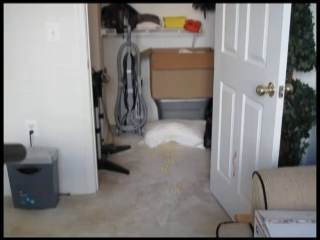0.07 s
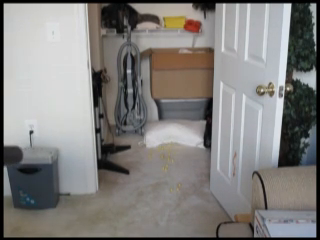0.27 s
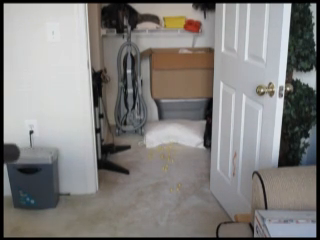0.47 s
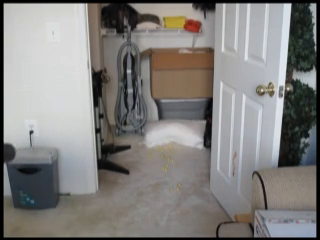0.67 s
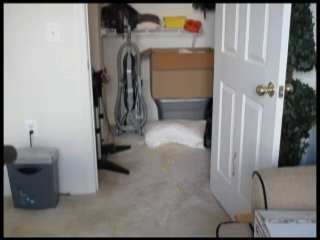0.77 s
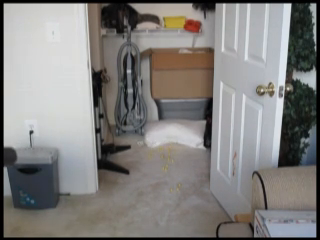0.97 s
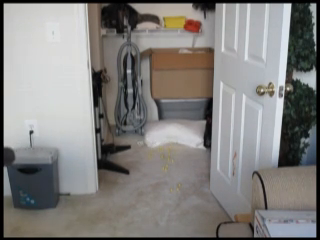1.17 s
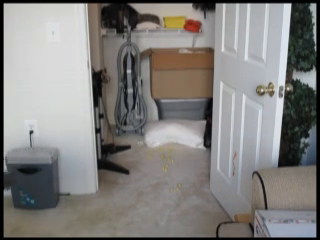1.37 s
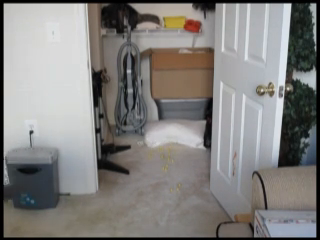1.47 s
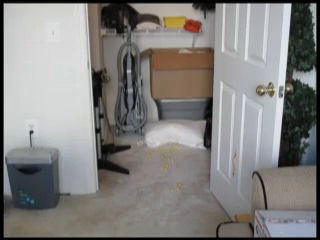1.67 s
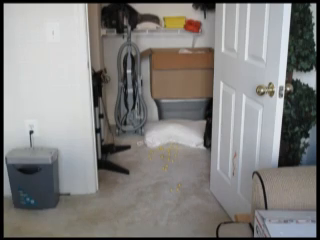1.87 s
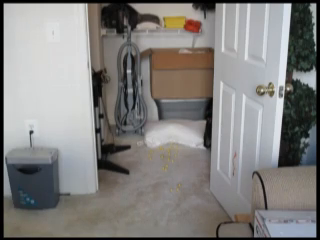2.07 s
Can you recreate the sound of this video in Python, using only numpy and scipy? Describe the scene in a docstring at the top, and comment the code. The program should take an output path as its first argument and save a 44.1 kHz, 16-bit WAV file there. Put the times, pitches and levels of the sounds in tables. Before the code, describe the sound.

A paintball marker fires about eight rapid cycles from 0 to 0.67 s, sharp cracks with gas pops, hammer rasp and bright, half-second room ring. Balls thud dully into a closet pillow, the last at 0.72. A rumbling hiss swells around 0.8-0.9. Hard hollow balls click from 0.85 to 1.2. Faint rustle follows; hand knocks and rubbing on the camera run from 1.68, strongest near 1.92, over quiet hum and thin whine.

```python
"""A quick string of sharp shots from a paintball marker rings in a small, bright room, close to one microphone.
Each cycle sums a noise rasp (hammer), bell pulses (gas), damped sines (crack, ping, ticks) and a diffuse tail.
The balls thud into a pillow in a closet as noise bursts; a rumbling hiss swells after the last cycle.
Hard balls click as noise snaps and damped modes, and a hand knocks and rubs on the camera body.
Steady noise, a faint rustle and two sines, a hum and a whine, lie underneath."""
import sys
import numpy as np
from scipy import signal
from scipy.fft import rfft, irfft, next_fast_len
from scipy.io import wavfile
from scipy.ndimage import map_coordinates

SR = 44100
rng = np.random.default_rng(int(sys.argv[2]) if len(sys.argv) > 2 else 0)


def unload_audio(sound):
    """Save the sound as a 16-bit wav file, at the path given as the first command line argument."""
    columns = np.transpose(np.atleast_2d(sound))
    # keep every value between -1 and 1, then stretch to whole-number steps
    steps = np.round(np.clip(columns, -1, 1) * 32767)
    wavfile.write(sys.argv[1], SR, steps.astype(np.int16))


N = 93888
LEAD = SR // 10  # samples kept ahead of time zero, for sounds that precede their event
T = np.arange(-LEAD, N) / SR  # time since an event [s]

# colour of the hammer's rasp and of the crack's spitting noise: (frequency [Hz], level [dB])
RASP_COLOUR = [(60, -38), (150, -1), (350, 6), (800, 2.5), (1400, -1), (2900, -1.5), (5000, -2), (7500, -3),
               (9800, 3), (11500, -9.5)]
# vibration modes of the hollow camera body: (frequency [Hz], level [dB], t60 [s])
BODY_MODES = [(442, -17.5, 0.13), (531, -10, 0.026), (597, -9.5, 0.071), (668, 4, 0.011),
              (1005, -19, 0.087), (1206, -13, 0.01), (2060, -31, 0.03)]
# colour of fingertip contact: (frequency [Hz], level [dB])
FINGERTIP_COLOUR = [(300, -10.5), (1100, 6), (2500, -9.5), (5000, -16), (11000, -24)]
# colour of the room's diffuse answer to a shot: (frequency [Hz], level [dB])
ROOM_COLOUR = [(40, -35), (100, -19), (200, -6), (320, -5), (580, -1), (720, -11.5), (900, -2), (1400, -4),
               (1800, -2.5), (2600, -1), (3800, -5), (6500, -5.5), (8500, -1.5), (9700, -1.5),
               (10700, -3.5), (11500, -14)]
KNOCK_RISE_S = 0.0015


def amp(db):
    """A level in decibels is 20 times the log of the amplitude ratio."""
    return 10 ** (np.asarray(db) / 20)


def unit(x):
    """Normalisation: equal mean power, rms 1."""
    return x / np.sqrt(np.mean(x ** 2) + 1e-20)


def along(points, hz):
    """Interpolation of (frequency [Hz], value) points on a logarithmic frequency axis."""
    f, v = np.transpose(points)
    return np.interp(np.log(hz + 1), np.log(f + 1), v)


def filtered(x, response):
    """Linear filtering: the spectrum of x is multiplied by a response of frequency."""
    m = next_fast_len(len(x) + 8192, True)  # padding keeps the filter's tail from wrapping round
    hz = np.fft.rfftfreq(m, 1 / SR)
    return irfft(rfft(x, m) * response(hz), m)[:len(x)]


def thin(x, cut_hz):
    """Weak bass radiation: a causal second-order high-pass."""
    def response(hz):
        return (1j * hz) ** 2 / (cut_hz ** 2 - hz ** 2 + np.sqrt(2) * 1j * hz * cut_hz)
    return filtered(x, response)


def noise(spectrum):
    """Spectral shaping: white noise coloured by a spectrum, rms 1."""
    white = rng.standard_normal(len(T))
    return unit(filtered(white, lambda hz: amp(along(spectrum, hz))))


def fade(t60, rise=1e-4, delay=0):
    """Exponential decay, 60 dB in t60 seconds, after a quick attack."""
    t = np.maximum(T - delay, 0)
    return amp(-60 * t / t60) * (1 - np.exp(-t / rise))


def bump(delay, width):
    """Gaussian pulse: a bell-shaped swell."""
    return np.exp(-.5 * ((T - delay) / width) ** 2)


def level(s, db):
    """Slow gain interpolated in decibels, down at -120 dB before its first point."""
    return amp(np.interp(T, s, db, left=-120))


def ring(modes, rise, detune, spread_db):
    """Modal synthesis: a sum of damped sines, a little different at every blow."""
    total = 0
    for hz, db, t60 in modes:
        gain = amp(db + spread_db * rng.normal())
        mode_hz = hz * (1 + detune * rng.normal())
        total = total + gain * fade(t60, rise) * np.sin(2 * np.pi * mode_hz * T)
    return total


def at(s, x):
    """Time shift: x delayed by s seconds, or advanced if s is negative."""
    if s < 0:
        return np.interp(T - s, T, x, left=0, right=0)
    return np.pad(x, (round(s * SR), 0))[:len(x)]


def room_tail(spectrum):
    """Diffuse reverberation: coloured noise in which each frequency decays at its own rate."""
    # reverberation time: (frequency [Hz], t60 [s])
    decay_times = [(150, 0.48), (500, 0.59), (2500, 0.56), (6000, 0.58), (10000, 0.67)]
    rise_s = 0.0013
    hz, t, z = signal.stft(noise(spectrum), SR, nperseg=256)
    since = np.maximum(t + T[0], 0)
    z = z * amp(-60 * since / along(decay_times, hz)[:, None])
    tail = signal.istft(z, SR, nperseg=256)[1][:len(T)]
    return tail * (1 - np.exp(-np.maximum(T, 0) / rise_s))


def marker():
    """Superposition: every cycle is a direct sound, its wall echoes and its reverberation."""
    # firing cycles: (time [s], crack [dB], gas push [dB], hammer rasp [dB], room [dB])
    cycles = [(-.009, 0.5, 10.5, -10, -1.5), (0.0567, -4.5, -11.5, -6, -2), (0.1561, 0.5, 1.5, 8, -0.5),
              (.2752, -0.5, 5.5, 6, 1), (.39, 1.5, 6.5, 8, 0), (0.508, 2, 5, 9, -1),
              (.6101, 2.5, 4, 5.5, -3), (0.6675, -2.5, -8, 2, -1.5)]
    usual_tail = room_tail(ROOM_COLOUR)
    out = 0
    for s, crack_db, push_db, rasp_db, room_db in cycles:
        push = gas_push(push_db)
        burst = crack()
        sharp = burst + metal_ping() + bolt_ticks() + wall_echoes(burst + push)
        answer = diffuse_room(usual_tail) + lingering_modes()
        out = out + at(s, push + amp(crack_db) * sharp + hammer_rasp(rasp_db) + amp(room_db) * answer)
    return out


def hammer_rasp(rasp_db):
    """Sliding friction: noise that starts ahead of the crack and dies quickly after it."""
    lead_s, rise_s, t60_s, stop_t60_s = 0.0189, 0.0019, 0.11, 0.029
    slide = fade(t60_s, rise=rise_s, delay=-lead_s)
    stop = amp(-60 * np.maximum(T, 0) / stop_t60_s)
    return amp(-25.5 + rasp_db) * slide * stop * noise(RASP_COLOUR)


def gas_push(push_db):
    """Expanding gas: bell-shaped pressure pulses through a first-order high-pass."""
    # pressure pulses: (delay after the crack [s], width [s], level [dB])
    pulses = [(-.00077, 0.00014, -11), (.0014, 0.00024, -13)]
    cut_hz = 380
    pressure = sum(amp(db) * bump(delay, width) for delay, width, db in pulses)
    return filtered(amp(push_db) * pressure, lambda hz: 1j * hz / (cut_hz + 1j * hz))


def crack():
    """Impulsive excitation: short damped rings and a spit of decaying noise."""
    # short rings: (frequency [Hz], level [dB], t60 [s])
    rings = [(2970, 3, 0.0025), (4840, 0, 0.0018)]
    spit = amp(-10) * fade(t60=0.01) * noise(RASP_COLOUR)
    return ring(rings, rise=2e-5, detune=.03, spread_db=.7) + spit


def metal_ping():
    """Resonance of struck metal: one delayed damped sine, slightly detuned each time."""
    ping_hz = 9670 * (1 + .012 * rng.normal())
    return amp(2) * fade(t60=0.003, rise=0.00029, delay=.002) * np.sin(2 * np.pi * ping_hz * T)


def bolt_ticks():
    """Brief impacts: Gaussian-windowed sines as the bolt runs back and forward."""
    # ticks: (delay after the crack [s], frequency [Hz], level [dB])
    impacts = [(.0155, 8000, -18.5), (0.0163, 9200, -26), (0.0197, 8870, -12.5), (0.041, 10100, -14.5)]
    width_s = 0.0002
    return sum(amp(db) * bump(delay, width_s) * np.sin(2 * np.pi * hz * T) for delay, hz, db in impacts)


def wall_echoes(direct):
    """Specular reflection: weaker, delayed copies of the direct sound."""
    # reflections: (delay [s], level [dB])
    reflections = [(.0072, -27), (0.014, -17), (0.0159, -18.5)]
    return sum(amp(db) * at(delay, direct) for delay, db in reflections)


def diffuse_room(usual_tail):
    """Reverberation of a fixed room: part of its answer repeats from cycle to cycle."""
    same = 0.74  # repeated share of the power
    tail = np.sqrt(same) * usual_tail + np.sqrt(1 - same) * room_tail(ROOM_COLOUR)
    early = bump(delay=0.018, width=0.0035) * noise(ROOM_COLOUR)
    return amp(-21.5) * tail + amp(-26) * early


def lingering_modes():
    """Modal resonance: the room and the marker's metal ring on as damped sines."""
    # resonances: (frequency [Hz], level [dB], t60 [s])
    resonances = [(311.5, -27, 0.14), (431, -32, 0.067), (589, -27.5, 0.16), (911, -38.5, 0.51),
                  (1020, -57, 0.34), (1459, -34.5, 0.27), (2270, -37, .35), (2433, -35.5, 0.53),
                  (2670, -42, 0.83), (9480, -32.5, 0.48), (9700, -39, .4), (10800, -42, 0.32)]
    return ring(resonances, rise=.004, detune=.001, spread_db=2)


def pillow():
    """Soft impact: each ball lands as a dull noise burst, and the closet booms just after."""
    # landings: (time [s], level [dB])
    landings = [(0.046, -34), (.212, -21.5), (.332, -24), (0.445, -22.5), (.724, -20.5)]
    # colour of the slap: (frequency [Hz], level [dB])
    slap_colour = [(60, -25), (200, -14), (500, 3.5), (900, -5.5), (1600, -10), (4000, -14), (11000, -32)]
    # colour of the closet's boom: (frequency [Hz], level [dB])
    boom_colour = [(90, -26), (170, -7.5), (280, 1), (450, -12), (800, -12), (3000, -22)]
    out = 0
    for s, db in landings:
        slap = fade(t60=0.079, rise=0.00034) * noise(slap_colour)
        boom = amp(-5.5) * bump(delay=0.035, width=0.018) * noise(boom_colour)
        out = out + amp(db) * at(s, slap + boom)
    return out


def after_swell():
    """Turbulence noise: a rumble and a hiss, probably escaping gas, swell and die away."""
    # swell, before the trims below: (time [s], rumble [dB], hiss [dB])
    swell = [(0.7, -30, -55), (0.732, -34, -37.5), (0.798, -30, -26.5), (0.85, -30, -24.5),
             (0.996, -56, -42), (1.018, -49, -45), (1.06, -66, -57)]
    # colour of the rumble: (frequency [Hz], level [dB])
    rumble_colour = [(30, -33), (90, -33), (150, -6.5), (250, 0), (360, -6), (560, 0.5), (750, -12),
                     (1200, -32)]
    # colour of the hiss: (frequency [Hz], level [dB])
    hiss_colour = [(410, -47), (700, -4), (1090, 2), (1300, 0), (2150, -3), (3250, 0.5), (4610, -8),
                   (9420, -3), (11500, -16), (15000, -47), (22000, -120)]
    rumble_trim_db, hiss_trim_db = 2, 0
    s, rumble_db, hiss_db = np.transpose(swell)
    release = amp(-60 * np.maximum(T - s[-1], 0) / .5)  # t60 of 0.5 s after the last point
    rumble = level(s, rumble_db + rumble_trim_db) * noise(rumble_colour)
    hiss = level(s, hiss_db + hiss_trim_db) * noise(hiss_colour)
    return release * (rumble + hiss)


def loose_balls():
    """Hard contact: a band of noise snaps, hollow plastic rings in its modes, and the room answers."""
    # clicks: (time [s], hollow ring [dB], snap [dB], snap centre [Hz])
    clicks = [(0.8537, -15, -15.5, 5380), (0.8624, -25, -9.5, 10100), (0.908, -23, -30, 3500),
              (0.925, -29, -22, 4500), (0.9431, -18.5, -17.5, 4120), (0.9992, -36, -30, 10000),
              (1.0116, -30, -19.5, 7000), (1.0175, -28, -21.5, 6300), (1.087, -16, -16.5, 5200),
              (1.1022, -31, -19.5, 7900), (1.124, -44, -22, 8400), (1.1294, -21, -22.5, 3900),
              (1.138, -30, -19, 6700), (1.18, -30, -43, 3040), (1.192, -25.5, -27.5, 5840),
              (1.2146, -34, -27, 6200)]
    # modes of hollow plastic: (frequency [Hz], level [dB], t60 [s])
    plastic_modes = [(690, -23.5, 0.051), (912, -9, 0.032), (1150, -12.5, 0.017), (1553, -7.5, 0.038),
                     (1728, -6, 0.03), (2500, -5.5, 0.021), (2990, 1, 0.013), (3940, -7, 0.023),
                     (4700, -13, 0.011)]
    # colour of the room's answer to the ring: (frequency [Hz], level [dB])
    answer_colour = [(150, -21), (600, -2), (1600, -3), (3500, -2.5), (6000, -17), (9000, -17),
                     (11500, -33)]
    out = 0
    for s, ring_db, snap_db, snap_hz in clicks:
        snap = snap_noise(snap_hz)
        hollow = amp(ring_db) * ring(plastic_modes, rise=.0002, detune=.025, spread_db=1.5)
        direct = hollow + amp(snap_db) * fade(t60=0.0096) * snap
        ring_answer = amp(ring_db - 22) * room_tail(answer_colour)
        snap_answer = amp(snap_db - 19) * fade(t60=.22, rise=0.0033) * snap
        out = out + at(s, direct + ring_answer + snap_answer)
    return thin(out, cut_hz=560)  # small bodies radiate little bass


def snap_noise(centre_hz):
    """Band-limited contact noise: a bell in octaves about its centre, cut steeply at the top."""
    width_octaves, top_hz = 0.93, 10470

    def response(hz):
        octaves = np.log2((hz + 1) / centre_hz)
        return np.exp(-.5 * (octaves / width_octaves) ** 2) / (1 + (hz / top_hz) ** 40)
    return unit(filtered(rng.standard_normal(len(T)), response))


def handling():
    """Contact excitation: knocks and rubbing drive a small body that radiates little bass."""
    return thin(body_knocks() + body_rubbing(), cut_hz=240)


def body_knocks():
    """Modal excitation by impact: each touch tilts the balance of the body's modes its own way."""
    # knocks: (time [s], level [dB], tilt [dB per octave], scratch relative to the knock [dB])
    touches = [(1.683, -24, -22, -33), (1.7026, -17.5, -8, -32), (1.762, -21, 0, -20),
               (1.796, -25, -25, -29), (1.829, -18, -8, -30), (1.8395, -13, 0, -10), (1.847, -14, 4, -21),
               (1.8783, -19, 6, -10), (1.907, -13.5, 4, -15), (1.9172, -3.5, 2, -19.5),
               (1.9343, -4, -0.5, -20), (1.942, -19, 0, -28), (1.958, -19.5, 10, -24),
               (1.984, -14.5, 4, -21), (2.023, -13.5, -5, -28), (2.033, -47, 4, -22),
               (2.0497, -15, 5, -7.5), (2.089, -28.5, 7.5, -26), (2.1005, -12, 10, -29),
               (2.11, -17, 8, -7.5)]
    pivot_hz = 600  # the tilt leaves this frequency unchanged
    out = 0
    for s, db, tilt, scratch_db in touches:
        modes = [(hz, mode_db + tilt * np.log2(hz / pivot_hz), t60) for hz, mode_db, t60 in BODY_MODES]
        body = ring(modes, KNOCK_RISE_S, detune=.012, spread_db=1)
        scratch = amp(scratch_db) * fade(t60=0.032) * noise(FINGERTIP_COLOUR)
        out = out + amp(db) * at(s, body + scratch)
    return out


def body_rubbing():
    """Friction: grainy noise, plus fingertip noise convolved with the body's impulse response."""
    # rubbing: (time [s], level [dB])
    grip = [(1.66, -45.5), (1.736, -51), (1.906, -29.5), (2.014, -30.5), (2.128, -26.5)]
    # colour of the grainy rub: (frequency [Hz], level [dB])
    rub_colour = [(60, -37), (150, -28), (280, -4.5), (410, -2.5), (520, -16), (750, -2), (1000, -9),
                  (1300, -20), (2300, -23.5), (6000, -40), (11000, -61)]
    answer = ring(BODY_MODES, KNOCK_RISE_S, detune=0, spread_db=0)[LEAD:]
    rub_ring = unit(signal.fftconvolve(noise(FINGERTIP_COLOUR), answer)[:len(T)])
    rub = amp(-5.5) * stick_slip() * noise(rub_colour) + amp(-4) * rub_ring
    return level(*np.transpose(grip)) * rub


def stick_slip():
    """Stick-slip: the uneven gain of a finger that catches and slides, a smooth random dB curve."""
    depth_db, grains_per_s = 4.5, 130
    knots = rng.standard_normal(2000)
    return unit(amp(depth_db * map_coordinates(knots, [(T - T[0]) * grains_per_s])))


def background():
    """Stationary noise and pure tones: room noise, a faint rustle, hum and the camera's thin whine."""
    # colour of the room noise: (frequency [Hz], level [dB])
    floor_colour = [(25, 7.5), (70, 4.5), (110, 0.5), (200, 3), (500, -2), (1000, -15), (2000, -26),
                    (4000, -41), (8000, -33), (10500, -36), (11500, -44)]
    # rustle: (time [s], level [dB])
    rustle_levels = [(1.3, -60.5), (1.37, -47.5), (1.54, -46), (1.61, -42.5), (1.67, -49.5), (1.85, -45.5),
                     (2.13, -42.5)]
    # colour of the rustle: (frequency [Hz], level [dB])
    rustle_colour = [(300, -24), (1200, 2), (3500, -6), (7000, -11.5), (10000, -8), (11500, -21)]
    # room hum and camera whine: (frequency [Hz], rms level [dB])
    steady_tones = [(105, -65), (5880, -55.5)]
    # a sine of amplitude sqrt(2) has rms 1
    tones = sum(np.sqrt(2) * amp(db) * np.sin(2 * np.pi * hz * T) for hz, db in steady_tones)
    rustle = level(*np.transpose(rustle_levels)) * noise(rustle_colour)
    return amp(-54) * noise(floor_colour) + rustle + tones


def scene():
    """Superposition: all sources add at one microphone."""
    mono = marker() + pillow() + after_swell() + loose_balls() + handling() + background()
    mono = mono[LEAD:]
    return np.array([mono, mono])


def record(dry):
    """Transducer limits: the camera thins deep bass, saturates peaks and cuts steeply at its band limit."""
    low_cut_hz, peak, top_hz = 75, .78, 11250  # peak: the amplitude that saturation approaches
    x = filtered(dry[0], lambda hz: 1j * hz / (low_cut_hz + 1j * hz))
    x = x / (1 + (x / peak) ** 4) ** (1 / 4)
    x = filtered(x, lambda hz: 1 / np.sqrt(1 + (hz / top_hz) ** 140))
    return np.array([x, x])


dry = scene()
out = record(dry)
unload_audio(out)
```